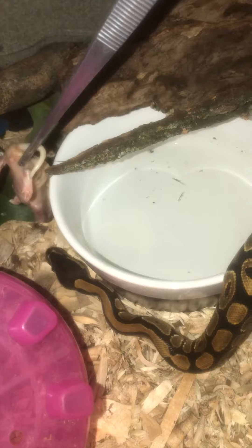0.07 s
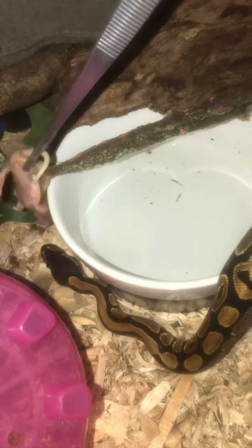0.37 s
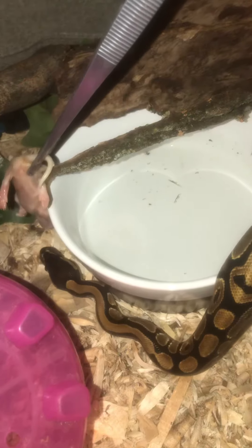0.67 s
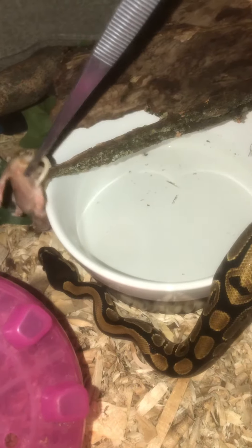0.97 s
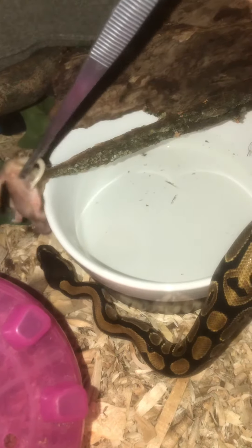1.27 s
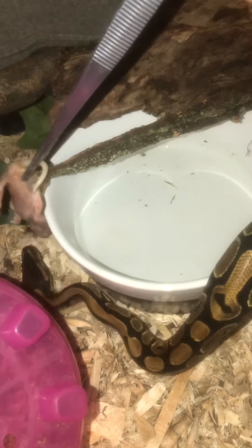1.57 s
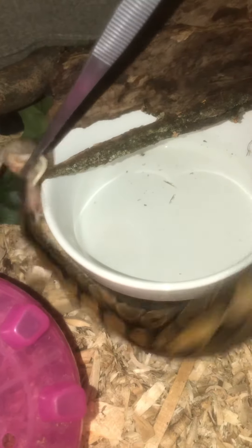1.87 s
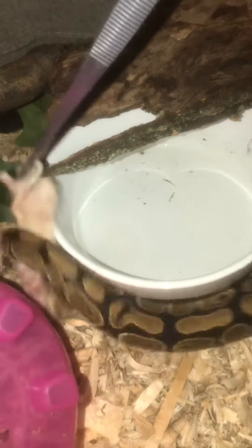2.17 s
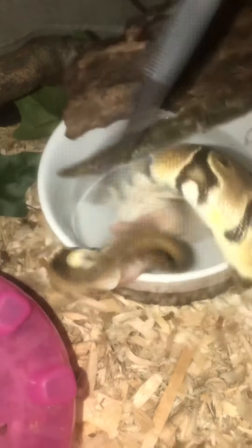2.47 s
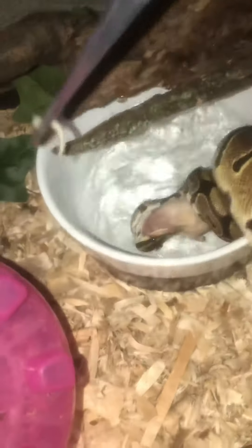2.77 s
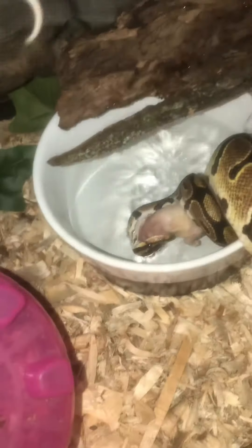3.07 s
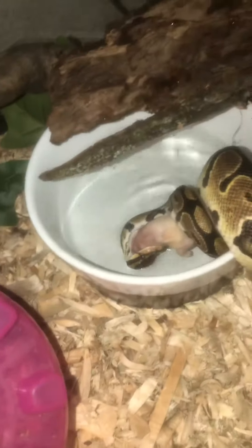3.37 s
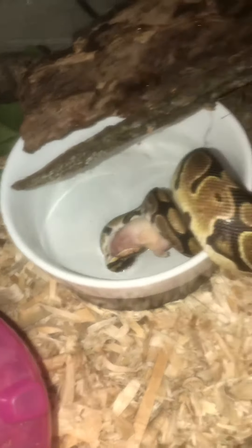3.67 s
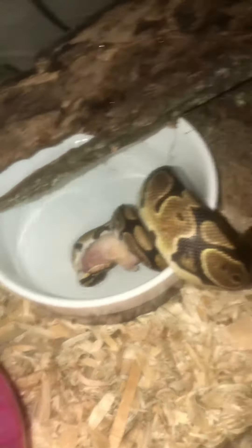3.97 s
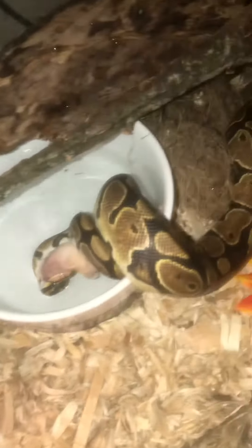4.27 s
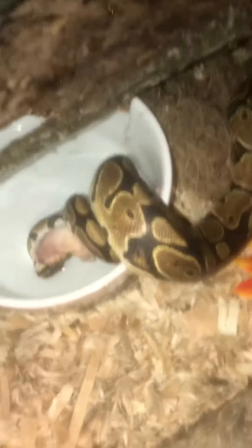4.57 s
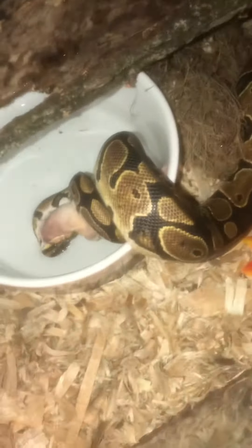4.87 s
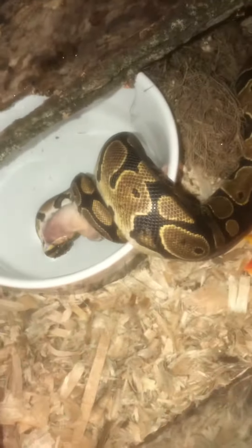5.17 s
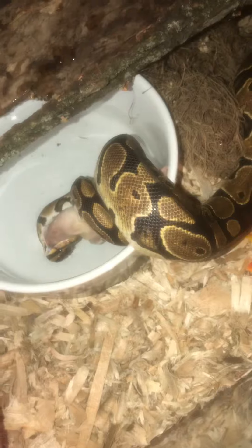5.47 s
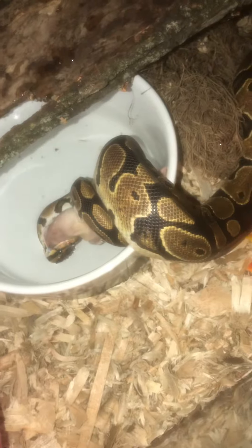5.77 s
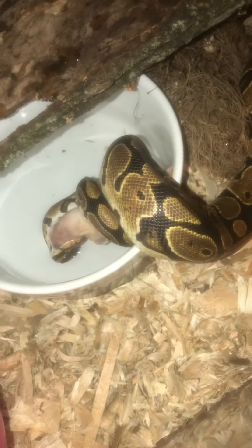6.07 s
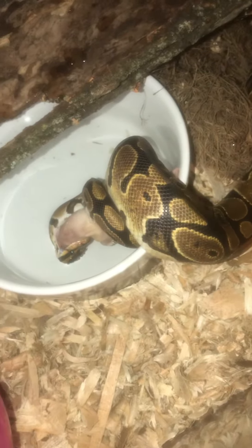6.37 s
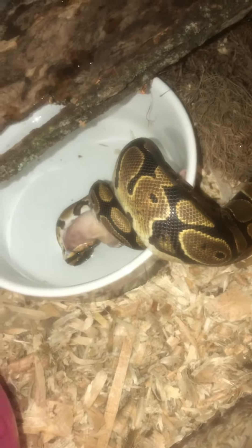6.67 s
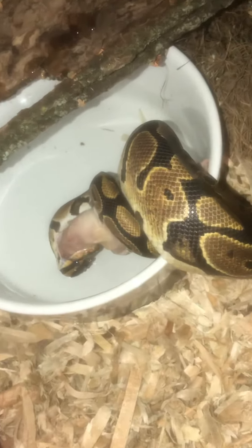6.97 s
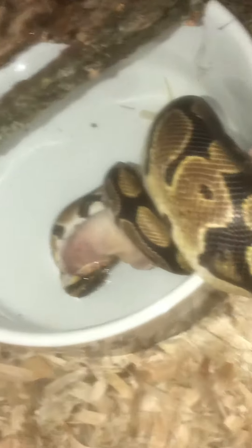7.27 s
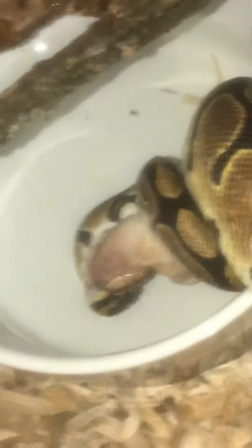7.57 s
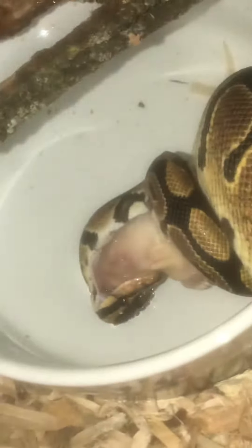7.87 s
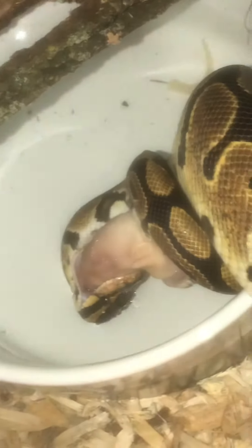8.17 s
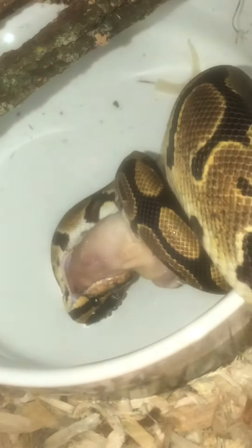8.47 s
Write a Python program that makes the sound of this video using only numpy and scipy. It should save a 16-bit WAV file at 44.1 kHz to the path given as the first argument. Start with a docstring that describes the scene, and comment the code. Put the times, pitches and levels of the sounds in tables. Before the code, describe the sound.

A low hum and a fan fill a quiet room. Wood shavings rustle as a snake lunges, and its body hits the enclosure with loud knocks and a run of soft thumps. Steel tongs ring briefly, and there is a short splash in a water bowl. A scrape, a few more bumps and scales rubbing on ceramic follow, then only faint ticks. The microphone is close.

```python
"""A mains hum and a fan fill a quiet room. Wood shavings rustle as a small python lunges at prey held in
steel tongs: its soft body thumps, hard knocks excite the modes of its enclosure, and the tongs ring briefly.
It drags the prey into a ceramic water bowl with a splash, in which trapped bubbles resonate. Then friction
takes over: a coil scrapes across the rim and scales rub over the bowl in slow strokes."""
import sys
import numpy as np
from scipy import signal
from scipy.fft import rfft, irfft, next_fast_len
from scipy.io import wavfile
from scipy.ndimage import map_coordinates

SR = 44100
rng = np.random.default_rng(int(sys.argv[2]) if len(sys.argv) > 2 else 0)


def dump(signal):
    """Clip the signal to [-1, 1] and save it as 16-bit WAV at the path in sys.argv[1]."""
    limited = np.clip(np.atleast_2d(signal).T, -1, 1)
    pcm = np.round(limited * 32767).astype(np.int16)
    wavfile.write(sys.argv[1], SR, pcm)


N = 380583
TIME = np.arange(N) / SR
RING_TIME = TIME[:SR // 2]  # time axis of one short event
LOW_CUT_HZ, TOP_HZ = 28, 16000


def amp(db):
    """Decibels to amplitude ratio."""
    return 10 ** (np.asarray(db) / 20)


def unit_rms(x):
    """Normalisation to rms 1."""
    return x / np.sqrt(np.mean(x ** 2) + 1e-20)


def unit_peak(x):
    """Normalisation to peak 1."""
    return x / np.max(np.abs(x))


def add(track, start_s, sound):
    """Superposition: a sound adds to the track from start_s on."""
    part = track[round(start_s * SR):][:len(sound)]
    part += sound[:len(part)]


def wobble(knots_per_s):
    """Slow random modulation: a spline through Gaussian values."""
    return map_coordinates(rng.standard_normal(int(N * knots_per_s / SR) + 4), [TIME * knots_per_s])


def filtered(x, response):
    """Linear filtering: the spectrum of x times a frequency response."""
    size = next_fast_len(len(x) + 8192)
    hz = np.fft.rfftfreq(size, 1 / SR) + 0.00091  # never exactly 0 Hz
    return irfft(rfft(x, size) * response(hz), size)[:len(x)]


def coloured(x, spectrum):
    """Spectral shaping by (frequency_hz, density_db) points, at rms 1."""
    points_hz, db = np.transpose(spectrum)
    return unit_rms(filtered(x, lambda hz: amp(np.interp(np.log(hz), np.log(points_hz), db))))


def noise(spectrum, samples=N):
    """Gaussian noise shaped by a spectrum."""
    return coloured(rng.standard_normal(samples), spectrum)


def resonances(peaks):
    """Independent resonances add in power to form one spectrum."""
    hz = np.geomspace(20, SR / 2, 1500)
    power = sum((amp(db) / (1 + ((hz - centre) / width) ** 2)) ** 2 for centre, width, db in peaks)
    return np.column_stack([hz, 10 * np.log10(power)])


def crackle(spectrum, snaps_per_s, spread_db, friction):
    """Shot noise: tiny snaps of random size and pitch over a share of smooth friction noise."""
    size, pitch, when = rng.random((int(snaps_per_s * N / SR), 3)).T[:, :, None]
    step = np.arange(144)
    hz = 1200 + pitch * (TOP_HZ - 1200)
    strength = amp(-spread_db * np.log(size + .03))
    grains = strength * np.sin(2 * np.pi * hz * step / SR) * np.exp(-8 * step / len(step))
    positions = (when * N).astype(int) + step
    snaps = np.bincount(positions.ravel(), grains.ravel(), N)[:N]
    return coloured(unit_rms(snaps) + friction * rng.standard_normal(N), spectrum)


def fade(t60_s, rise_s):
    """Exponential decay after a rounded onset."""
    return np.exp(-np.log(1000) * RING_TIME / t60_s) * (1 - np.exp(-(RING_TIME / rise_s) ** 2))


def mode(hz, t60_s, rise_cycles):
    """A damped oscillator: a sine that builds up and decays."""
    return np.sin(2 * np.pi * hz * RING_TIME) * fade(t60_s, rise_cycles / hz)


def stroke(start_s, length_s):
    """Friction noise follows sliding speed, which rises, peaks and returns to rest."""
    fastest_s = start_s + 0.44 * length_s
    phase = np.interp(TIME, [start_s, fastest_s, start_s + length_s], [0, np.pi / 2, np.pi])
    return np.abs(np.sin(phase)) ** 1.66


# mains tones: pitch_hz, rms_db
HUM_TONES = [(119.9, -48.5), (947.5, -74.5)]
# moving air: frequency_hz, density_db
AIR_SPECTRUM = [(20, -61), (33, -18.5), (70, -6), (145, 3), (200, -11.5), (270, -19.5), (500, -14),
                (760, -12), (1150, -28.5), (1700, -28), (3000, -33.5), (5500, -41), (11000, -48),
                (16000, -47)]
# duct resonances of the fan: centre_hz, width_hz, level_db
FAN_RESONANCES = [(342.8, 28.6, 0), (380, 32.5, 1), (473, 18, -10), (665, 19, 1.5), (673, 22, -4.5),
                  (799, 33, 0), (1047, 68, -7), (1175, 48, -7.5), (1480, 210, -15), (2700, 47, -21.5),
                  (2950, 120, -34), (8930, 250, -36.5)]

def room_tone():
    """Mains tones waver in level and phase over broadband air noise and a fan's duct resonances."""
    hum = np.zeros(N)
    for hz, db in HUM_TONES:
        amplitude = np.sqrt(2) * amp(db + 0.69 * wobble(2.86))
        hum += amplitude * np.sin(2 * np.pi * hz * TIME + 0.062 * wobble(4.3))
    return hum + amp(-53.5) * noise(AIR_SPECTRUM) + amp(-57.5) * noise(resonances(FAN_RESONANCES))


def wall_reverb(x, t60_s, wet_db):
    """Reverberation: dense reflections in the small enclosure form a short tail with little bass."""
    spectrum = [(100, -10), (500, -7), (1200, -2), (4000, -2), (16000, -6)]
    tail = noise(spectrum, len(RING_TIME)) * fade(t60_s, 0.0025)
    return x + amp(wet_db) * signal.fftconvolve(x, tail / np.linalg.norm(tail))[:N]


# reflections from the near glass: delay_s, level_db
PANE_ECHOES = [(.0011, -23.5), (.0019, -22), (.0031, -15), (.0044, -15)]

def pane_reflections(x):
    """Comb filtering: treble thrown back by the panes interferes with the direct sound."""
    echoes = lambda hz: sum(amp(db) * np.exp(-2j * np.pi * hz * delay_s) for delay_s, db in PANE_ECHOES)
    return filtered(x, lambda hz: 1 + echoes(hz) * hz ** 2 / (hz ** 2 + 900 ** 2))


# shifts of the body's weight: start_s, level_db, t60_s
WEIGHT_SHIFTS = [(1.07, -48, 0.34), (1.205, -40.5, 0.27), (3.2, -29.5, 0.74), (3.94, -45, .5)]
# the shaking floor: frequency_hz, density_db
SHUDDER_SPECTRUM = [(18, -34), (30, 2), (45, -20), (70, 3), (130, 2), (250, -10), (800, -54)]

def floor_shudder():
    """Damped vibration: the floor shakes under a shift of weight and settles."""
    envelope = np.zeros(N)
    for start_s, db, t60_s in WEIGHT_SHIFTS:
        add(envelope, start_s, amp(db) * fade(t60_s, rise_s=0.0052))
    return envelope * noise(SHUDDER_SPECTRUM)


# slow movements over the shavings: start_s, length_s, level_db
CREEP_STROKES = [(1.257, 0.53, -69.5), (4.625, 0.16, -71), (4.88, 0.37, -74.5), (5.204, 0.086, -66.5)]
# lightly stirred shavings: frequency_hz, density_db
CREEP_SPECTRUM = [(1500, -25), (3500, -2), (7000, -7), (11000, -6.5), (16000, -6)]

def creep():
    """Friction at low speed: slow strokes of the body make the shavings crackle faintly."""
    speed = sum(amp(db) * stroke(start_s, length_s) for start_s, length_s, db in CREEP_STROKES)
    return speed * crackle(CREEP_SPECTRUM, snaps_per_s=1300, spread_db=3, friction=1.7)


# scales sliding over the bowl: start_s, length_s, rub_db, hiss_db
SLIDE_STROKES = [(3.324, 0.25, -66, -55.5), (3.645, 0.22, -60.5, -66), (3.773, 0.31, -61.5, -67.5),
                 (3.978, 0.5, -66, -70), (4.216, 0.32, -59.5, -66.5)]
# resonances of the rubbing: centre_hz, width_hz, level_db
RUB_RESONANCES = [(960, 420, 3.5), (1390, 120, 1.5), (2010, 280, -5), (2480, 64, 1.5), (3420, 190, 1.5),
                  (3910, 41, -2), (4270, 90, -4), (4520, 60, -3), (4850, 150, -9), (5270, 110, -8)]
# hiss of the scales: frequency_hz, density_db
HISS_SPECTRUM = [(1500, -2), (4000, -6.5), (5800, -2.5), (7500, -6.5), (10200, -13), (12600, -15),
                 (15500, -13)]

def scale_slide():
    """Sliding friction: each stroke of scales over the bowl mixes a resonant rub with a bright hiss."""
    rub = sum(amp(db) * stroke(start_s, length_s) for start_s, length_s, db, _ in SLIDE_STROKES)
    hiss = sum(amp(db) * stroke(start_s, length_s) for start_s, length_s, _, db in SLIDE_STROKES)
    flutter = amp(.8 * wobble(60))
    return flutter * (rub * noise(resonances(RUB_RESONANCES)) + hiss * noise(HISS_SPECTRUM))


# the coil on the bowl's rim: frequency_hz, density_db
SCRAPE_SPECTRUM = [(250, -8), (500, 20), (1100, 8), (1800, 0), (3000, -6), (7000, -6.5), (10000, -19),
                   (16000, -22)]

def rim_scrape(start_s=3.18, length_s=0.082, level_db=-43, rise_s=0.0094, t60_s=0.034):
    """Rough friction: the coil catches on the rim, scrapes over it and lets go."""
    grip = np.clip((TIME - start_s) / rise_s, 0, 1)
    release = np.exp(-np.log(1000) * np.maximum(TIME - start_s - length_s, 0) / t60_s)
    scrape = crackle(SCRAPE_SPECTRUM, snaps_per_s=2000, spread_db=3.5, friction=1.2)
    return amp(level_db) * grip * release * scrape


# spells of faint ticking: start_s, end_s, ticks_per_s, level_db
TICK_SPELLS = [(2.152, 2.749, 18, -37), (2.753, 3.004, 8, -50)]

def stray_ticks(centre_hz=8050, t60_s=0.017, scatter_db=5):
    """Random impulses: rows for clicks(), scattered in time, level and pitch over each spell."""
    rows = []
    for start_s, end_s, ticks_per_s, db in TICK_SPELLS:
        length_s = end_s - start_s
        for when, size, pitch in rng.random((round(length_s * ticks_per_s), 3)):
            hz = centre_hz * 2 ** (2 * pitch - 1)
            rows.append((start_s + when * length_s, db + scatter_db * (2 * size - 1), hz, t60_s))
    return rows


# snapping shavings and small contacts: start_s, level_db, centre_hz, t60_s
SNAPS = [(1.919, -36, 7280, 0.035), (2.0422, -26.5, 2470, 0.028), (2.1041, -9.5, 1910, 0.011),
         (2.1046, -15, 12900, 0.0049), (2.120, -26, 3450, 0.016), (2.381, -36, 14000, .018),
         (2.4457, -28.5, 2800, 0.01), (2.578, -22, 12100, .036), (2.612, -35, 8400, 0.019),
         (2.635, -21, 13900, 0.013), (2.708, -32.5, 12600, .018), (2.726, -34, 5900, .027),
         (3.138, -31.5, 5800, 0.0085), (3.138, -30, 15000, 0.0063), (3.183, -33, 2770, 0.019),
         (3.2029, -29, 2360, 0.014), (3.586, -38.5, 14300, 0.016), (3.9273, -40.5, 4900, 0.012),
         (4.256, -34, 3000, 0.0067), (5.2185, -54, 5000, .018), (5.436, -49.5, 3300, .018),
         (6.671, -55, 9000, .015), (7.2581, -35, 8800, .007), (7.2585, -27.5, 1600, 0.0072)]

def clicks():
    """Brief transients have broad spectra: each snap is a band of noise with a faint short tail."""
    out = np.zeros(N)
    for start_s, db, centre_hz, t60_s in SNAPS + stray_ticks():
        band = lambda hz: amp(-22.5) + 1 / (1 + (np.log2(hz / centre_hz) / 0.33) ** 2)
        colour = lambda hz: band(hz) * hz ** 2 / (hz ** 2 + 1100 ** 2)
        burst = unit_rms(filtered(rng.standard_normal(len(RING_TIME)), colour))
        envelope = fade(t60_s, .0002) + amp(-24.5) * fade(0.02, .003)
        add(out, start_s, amp(db - 5.5) * burst * envelope)
    return out


# modes of the steel tongs: pitch_hz, level_db, t60_s
TONG_MODES = [(1153, -39.5, 0.11), (2597, -41.5, 1), (4330, -42, .055), (6760, -45, .09)]

def tong_ring(start_s=2.521, free_s=.056):
    """Free vibration: the tongs ring in their modes until they are damped."""
    out = np.zeros(N)
    ring = sum(amp(db) * mode(hz, t60_s, rise_cycles=2.1) for hz, db, t60_s in TONG_MODES)
    free = 1 / (1 + (RING_TIME / free_s) ** 12)
    damped = .2 * (1 - free) * fade(.5, .001)
    add(out, start_s, ring * (free + damped))
    return out


# modes of the ceramic bowl: pitch_hz, level_db, t60_s
BOWL_MODES = [(3900, -43.5, 0.032), (5340, -42, 0.025), (5800, -36.5, 0.015), (8850, -61, .025)]

def bowl_tap(start_s=3.6255):
    """Impulse response: one light tap gives contact noise and the bowl's short, high ring."""
    out = np.zeros(N)
    ring = sum(amp(db) * mode(hz, t60_s, rise_cycles=0.85) for hz, db, t60_s in BOWL_MODES)
    contact = amp(-45) * rng.standard_normal(len(RING_TIME)) * fade(0.022, 0.00024)
    add(out, start_s, ring + contact)
    return out


# the slap on the water: frequency_hz, density_db
SLAP_SPECTRUM = [(800, -19), (1530, -11), (2000, -5.5), (3200, -7.5), (5000, 0.5), (7500, -3),
                 (11000, -2.5), (16000, -24.5)]
# trapped air bubbles: start_s, pitch_hz, level_db, t60_s
BUBBLE_MODES = [(2.582, 1520, -29.5, 0.028), (2.583, 5070, -34, 0.028), (2.583, 7330, -27, 0.023),
                (2.659, 2980, -35.5, 0.017), (2.783, 5770, -53.5, 0.047), (2.848, 5600, -52, 0.024)]
# fine bubbles bursting: frequency_hz, density_db
FIZZ_SPECTRUM = [(4000, -20), (8000, -7), (12000, 4), (16000, -10)]

def splash(slap_s=2.580, fizz_s=3):
    """Bubble resonance: the coil slaps the water and traps air that rings; the finest bubbles fizz away."""
    out = np.zeros(N)
    add(out, slap_s, amp(-18) * noise(SLAP_SPECTRUM, len(RING_TIME)) * fade(0.028, 0.0032))
    for start_s, hz, db, t60_s in BUBBLE_MODES:
        add(out, start_s, amp(db) * mode(hz, t60_s, rise_cycles=1.5))
    add(out, fizz_s, amp(-57) * noise(FIZZ_SPECTRUM, len(RING_TIME)) * fade(0.3, 0.3))
    return out


# how hard the snake thrashes: time_s, effort_db
EFFORT = [(1.86, -59), (2.03, -53), (2.18, -58.5), (2.35, -58), (2.48, -52), (2.525, -45), (2.70, -51.5),
          (2.85, -65.5), (3.13, -71)]
# quick pushes through the shavings: start_s, level_db, rise_s, t60_s
PUSHES = [(1.731, -59, .004, .25), (1.817, -35.5, 0.035, 0.26), (1.914, -34.5, 0.007, 0.079),
          (1.966, -26.5, 0.018, 0.085)]
# crackling shavings: frequency_hz, density_db
SHAVINGS_SPECTRUM = [(700, -20), (1500, -0.5), (2600, 2), (5000, 0), (8000, -2), (12000, -4.5),
                     (16000, -1.5)]
# the body rubbing on the floor: frequency_hz, density_db
BODY_RUB_SPECTRUM = [(200, -28.5), (350, -1.5), (750, 0.5), (1000, -8.5), (1400, -11), (2500, -18.5),
                     (6000, -26)]
# the rumbling floor: frequency_hz, density_db
RUMBLE_SPECTRUM = [(20, -32.5), (32, -27), (50, -0.5), (100, -5.5), (165, -5), (230, -5), (400, -20),
                   (1000, -42)]

def rustle():
    """Amplitude modulation: one effort drives crackling shavings, the body's rub and the floor's rumble."""
    times_s, effort_db = np.transpose(EFFORT)
    effort = amp(np.interp(TIME, times_s, effort_db, left=-200, right=-200))
    pushes = np.zeros(N)
    for start_s, db, rise_s, t60_s in PUSHES:
        add(pushes, start_s, amp(db) * fade(t60_s, rise_s))
    shavings = crackle(SHAVINGS_SPECTRUM, snaps_per_s=2000, spread_db=4, friction=1.05)
    # the rub grows 0.25 dB per dB of effort and lasts until the snake lies in the bowl
    rub_level = amp(-44.5) * unit_peak(effort) ** 0.25 * stroke(start_s=1.77, length_s=1.0)
    rub = rub_level * amp(2 * wobble(50)) * noise(BODY_RUB_SPECTRUM)
    shavings_level = (effort + pushes) * amp(2.6 * wobble(60))
    rumble = effort * amp(6) * noise(RUMBLE_SPECTRUM)
    return shavings_level * shavings + rub + rumble


# heavy soft blows of the body, plus the 493 Hz ring of the hard knock at 3.93 s: start_s, level_db, pitch_hz,
# t60_s
SOFT_BLOWS = [(2.023, -13.5, 195, 0.033), (2.0454, -12.5, 178, .1), (2.079, -21.5, 156.7, 0.48),
              (2.134, -17.5, 154, 0.11), (2.232, -23.5, 161, 0.076), (2.259, -20, 155, 0.12),
              (2.318, -28.5, 150, 0.091), (2.393, -27.5, 162, 0.08), (2.52, -26.5, 193.6, 0.13),
              (2.59, -20.5, 164.7, 0.22), (2.704, -30.5, 152, 0.22), (3.202, -14.5, 150, 0.051),
              (3.204, -27, 74, .12), (3.246, -22.5, 163, 0.17), (3.268, -22.5, 169, 0.089),
              (3.45, -32, 193, 0.11), (3.933, -33, 493, .09), (3.934, -24.5, 182, 0.088)]

def thumps(bumps_per_s=20, bump_hz=161, over_effort_db=19.5):
    """Soft impacts excite low, damped oscillations; small bumps among the heavy blows follow the effort."""
    out = np.zeros(N)
    times_s, effort_db = np.transpose(EFFORT)
    beats_s = np.arange(times_s[0], times_s[-1], 1 / bumps_per_s)
    bumps = []
    for beat_s, (late, size, pitch) in zip(beats_s, rng.random((len(beats_s), 3)) - .5):
        db = np.interp(beat_s, times_s, effort_db) + over_effort_db + 6 * size
        bumps.append((beat_s + late / bumps_per_s, db, bump_hz * 2 ** (.5 * pitch), .13))
    for start_s, db, hz, t60_s in SOFT_BLOWS + bumps:
        add(out, start_s, amp(db - 1.5) * unit_peak(mode(hz, t60_s, rise_cycles=1)))
    return out


# hard blows on the enclosure: start_s, level_db, low_cut_hz, tilt_db_per_octave, ring_time_ratio
HARD_BLOWS = [(2.022, -21.5, 150, -7.5, .33), (2.042, -23.5, 400, -3, .47), (2.108, -4, 151, -1, 0.77),
              (2.1187, -9.5, 249, -4, 0.31), (2.134, -13, 200, -13.5, 0.54), (2.319, -26.5, 720, -5, 1.1),
              (3.187, -33, 500, -9, 0.4), (3.2623, -24, 705, -10, 0.8), (3.9293, -30, 440, 1, 0.84),
              (7.2587, -39.5, 646, -4.5, 0.47)]
# modes of the enclosure: pitch_hz, level_db, t60_s
ENCLOSURE_MODES = [(231, -11, 0.37), (308.7, -3.5, 0.23), (398, -1.5, 0.17), (528.3, -20.5, 0.61),
                   (573, -15.5, 0.21), (624, -6.5, 0.098), (718, 5, 0.028), (850, -4.5, 0.052),
                   (1008, -11.5, 0.089), (1248, -9, 0.083), (1367, -2.5, 0.025), (1620, -14.5, 0.065),
                   (1840, -17.5, 0.083), (2142, -12, 0.06), (2940, -17, 0.062), (3330, -11.5, .035),
                   (4010, -16, 0.07)]
# its many weak modes, merged into a rattle: frequency_hz, density_db
RATTLE_SPECTRUM = [(200, -27), (700, -2), (1800, -4.5), (4000, -20), (7000, -20), (14000, -41)]

def knocks():
    """Modal superposition: the force spectrum of each hard blow weights the modes of the enclosure."""
    out = np.zeros(N)
    for start_s, db, low_cut_hz, tilt_db, ring_ratio in HARD_BLOWS:
        tilt = lambda hz: amp(tilt_db * np.log2(np.maximum(hz, 200) / 700))
        force = lambda hz: tilt(hz) / (1 + (low_cut_hz / hz) ** 4)
        ring = np.zeros(len(RING_TIME))
        for k, (hz, mode_db, t60_s) in enumerate(ENCLOSURE_MODES):
            weight = (-1) ** k * amp(mode_db + rng.normal(0, 0.39)) * force(hz)
            ring += weight * mode(hz, t60_s * ring_ratio, rise_cycles=0.63)
        rattle = unit_rms(filtered(noise(RATTLE_SPECTRUM, len(RING_TIME)), force))
        rattle *= amp(-13.5) * fade(.05 * ring_ratio, 0.0014)
        add(out, start_s, amp(db) * (unit_peak(ring) + rattle))
    return out


def scene():
    """Superposition at one close microphone: impacts reverberate, and the panes colour all but the room."""
    impacts = thumps() + knocks() + clicks() + tong_ring() + bowl_tap() + splash()
    enclosure = wall_reverb(impacts, t60_s=0.12, wet_db=-16)
    enclosure += rustle() + creep() + floor_shudder() + rim_scrape() + scale_slide()
    return (amp(-0.18) * pane_reflections(enclosure) + room_tone())[None]


def record(dry):
    """Band limiting: the microphone sheds the deepest bass, and nothing above TOP_HZ is kept."""
    low_cut = signal.butter(4, LOW_CUT_HZ, "highpass", fs=SR, output="sos")
    return np.array([filtered(x, lambda hz: hz < TOP_HZ) for x in signal.sosfilt(low_cut, dry)])


dry = scene()
out = record(dry)
dump(out)
```